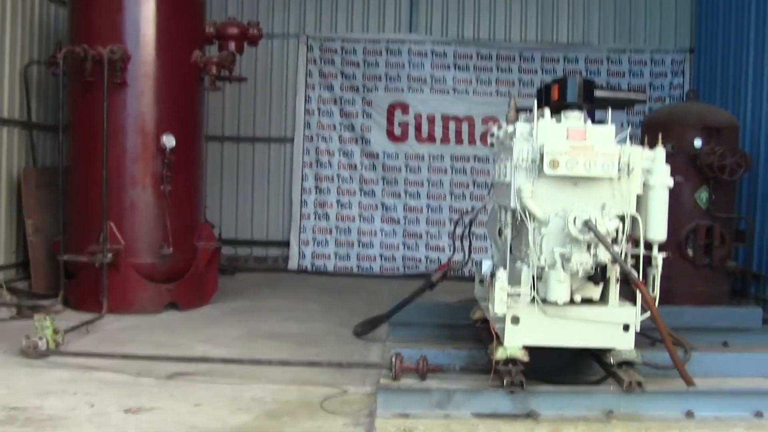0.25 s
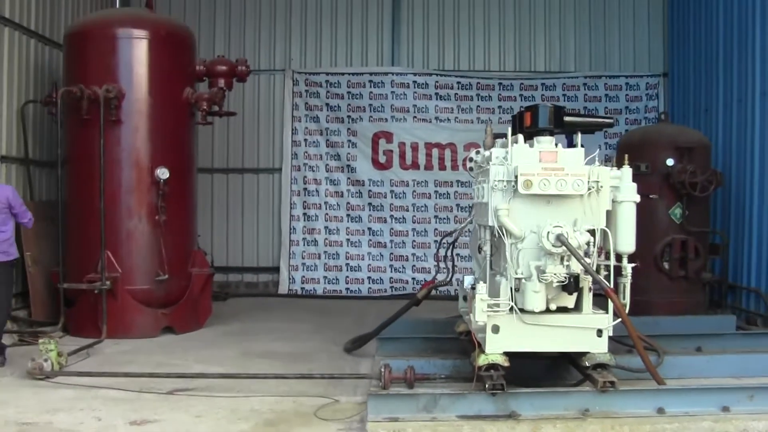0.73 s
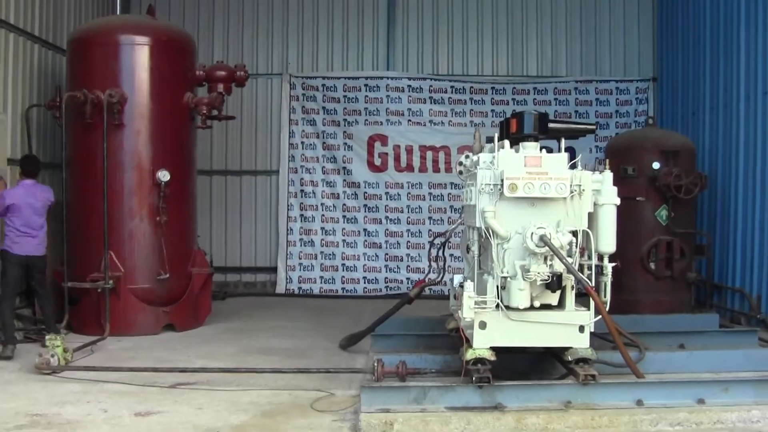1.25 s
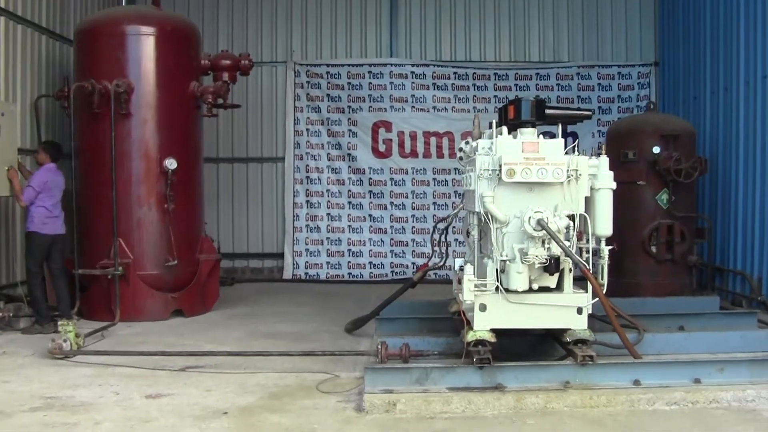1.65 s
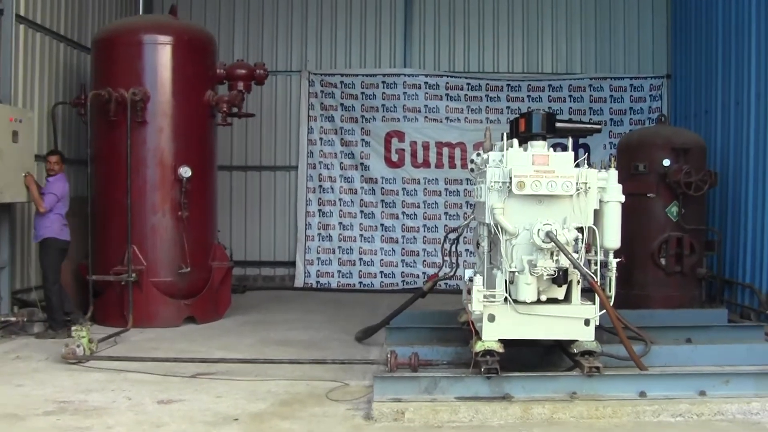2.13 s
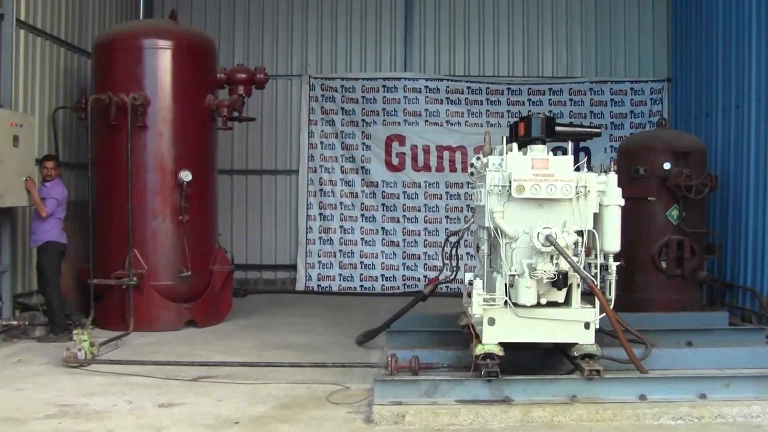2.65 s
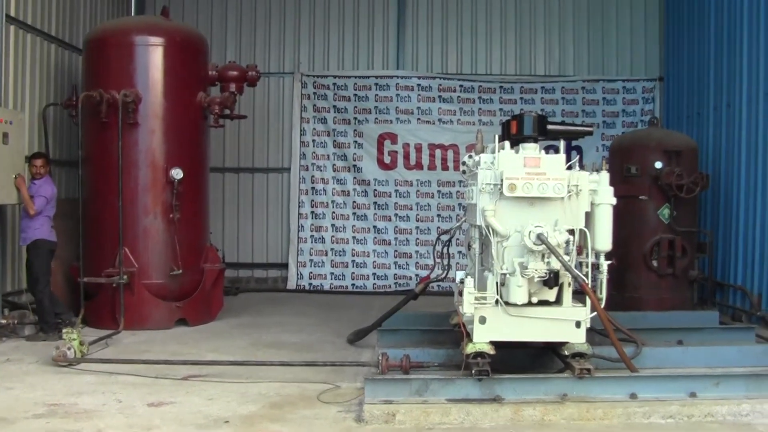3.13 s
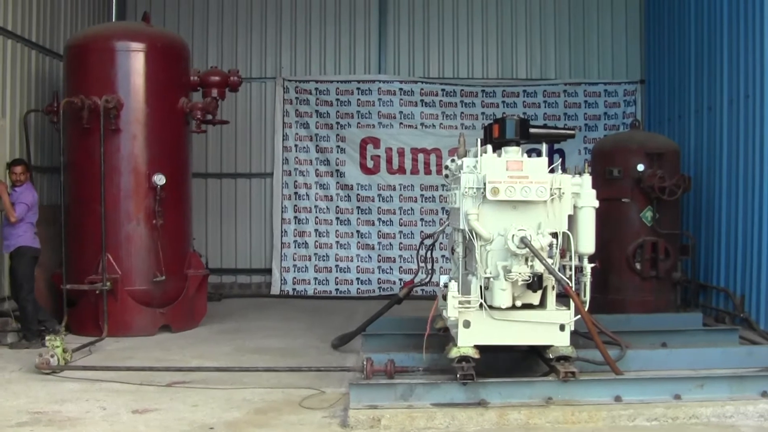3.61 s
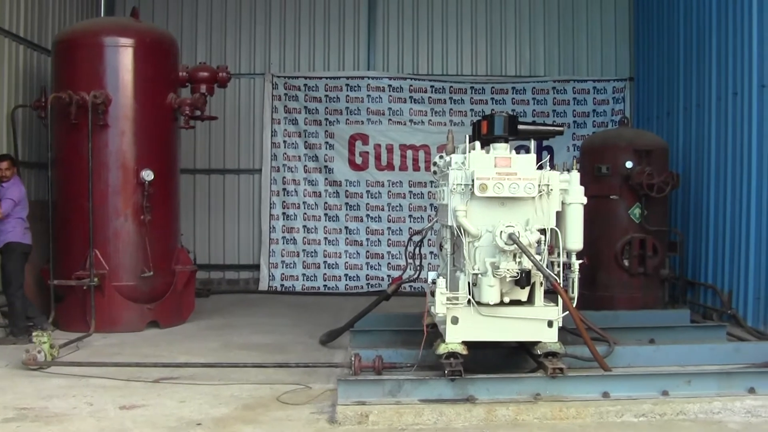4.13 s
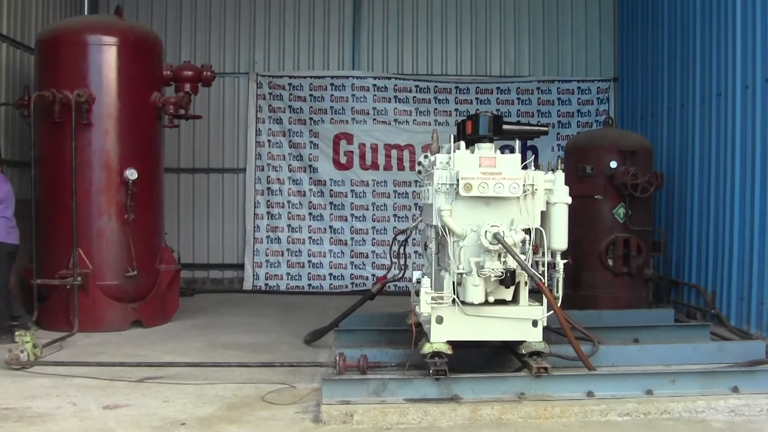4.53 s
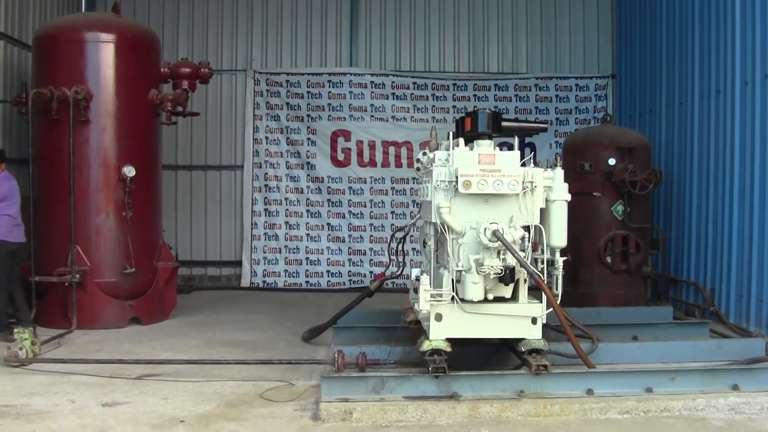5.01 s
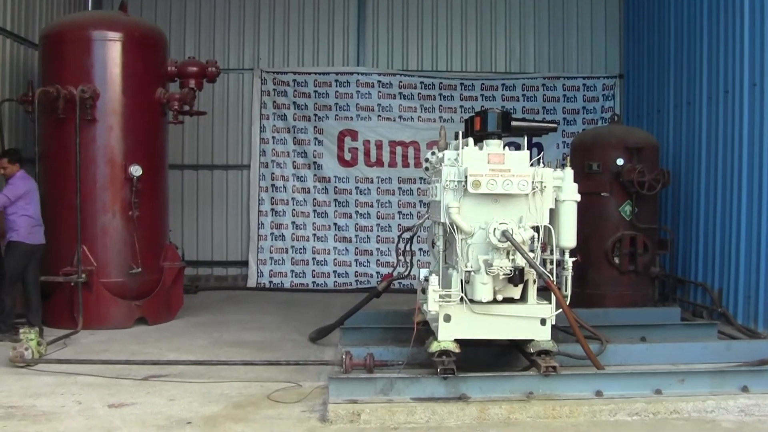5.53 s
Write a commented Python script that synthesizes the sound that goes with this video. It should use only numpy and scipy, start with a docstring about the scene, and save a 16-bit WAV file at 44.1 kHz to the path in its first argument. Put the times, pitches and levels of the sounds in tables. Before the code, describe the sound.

A piston compressor drones and clatters in a metal shed, is cut and chugs down quickly, then a loud blast of compressed air hisses to the end.

```python
"""A piston air compressor drones and clatters in a sheet-metal shed while the microphone backs off, then swings aside.
The drone is a sum of multiples of the crank speed; the clatter is ticks repeated every turn plus loose noise.
The motor is cut and the crank coasts down, chugging in noise puffs with a few ringing knocks.
Then the unloader valve blows off compressed air: shaped noise hisses, with a thin, sinking sine whistle."""
import sys
import numpy as np
from scipy import signal
from scipy.fft import rfft, irfft, next_fast_len
from scipy.io import wavfile
from scipy.ndimage import uniform_filter1d, map_coordinates

SR = 44100
rng = np.random.default_rng(int(sys.argv[2]) if len(sys.argv) > 2 else 0)


def wav_record(signal):
    """Record a signal, one row per channel, as 16-bit PCM in the file named by sys.argv[1]."""
    frames = np.transpose(np.atleast_2d(signal))
    bounded = np.clip(frames, -1, 1)
    # unit amplitude maps onto the largest positive 16-bit level
    quanta = np.round(bounded * 32767).astype(np.int16)
    wavfile.write(sys.argv[1], SR, quanta)


N = 254006
TIME = np.arange(N) / SR

# Crank slowing after the cut: (time [s], speed [turns per s])
COAST_SPEED = [(3.0, 24.68), (3.06, 22.8), (3.22, 19.2), (3.4, 15.5), (4.17, 4)]
# The microphone's walk away from the machine: (time [s], added distance [m])
WALK = [(0, 0), (.5, .2255), (1, .409), (1.5, .564), (2, .625), (3, .595)]
# Multiples of the crank speed; in the intake band the wall echoes swell about these levels:
# (order [per turn], level halfway along the walk [dB], tilt [dB per m], bend [dB per m^2],
# drift once the microphone swings [dB per s])
CRANK_ORDERS = [(1, -73.3, 19, -91, 2), (2, -52.4, 1, 4, -2), (3, -29.6, 2, -1, -1), (4, -45.4, 7, -37, 0),
                (5, -35.8, 8, 36, -1), (6, -24.4, -3, 9, 0), (7, -32.2, 3, 4, -2),
                (8, -31.3, -11, -87, -19), (9, -37.5, -29, -105, -1), (10, -34.5, 0, -43, -1),
                (11, -42.4, 27, -123, 0), (12, -40.0, -5, -20, 0), (13, -33.0, -32, -54, 10),
                (14, -29.6, -5, 34, -5), (15, -26.9, -1, -2, -2), (16, -34.2, -30, -108, 6),
                (17, -18.4, -8, 3, -1), (18, -19.4, 5, -50, 4), (19, -23.2, 4, -18, 1),
                (20, -18.5, 5, -91, 3), (21, -21.7, 9, -5, -2), (22, -24.6, -18, 30, -3),
                (23, -36.6, 10, 21, 0), (24, -33.9, 5, 13, 0), (25, -30.7, -14, -13, 0),
                (26, -39.3, -5, -17, -8), (27, -38.4, -18, -33, -16), (28, -39.3, -18, -25, 2),
                (29, -41.8, -8, -28, -1), (30, -41.4, -4, 40, 6), (31, -38.7, -8, -29, 0),
                (32, -42.9, 22, -8, -1), (33, -45.7, 25, -4, -1), (34, -38.1, -6, -44, -3),
                (35, -48.0, -1, 36, -3), (36, -43.3, -2, -151, 5), (37, -45.6, -7, 116, 0),
                (38, -43.5, -19, 19, 8), (39, -41.8, -18, -42, -3), (40, -46.9, 5, -55, 4),
                (41, -50.0, 4, 116, -3), (42, -50.6, 4, -37, 4), (43, -31.7, 3, -123, -7),
                (44, -48.9, -8, 54, 2), (45, -39.1, 0, -63, -18), (46, -44.3, -33, -56, 1),
                (47, -40.6, -3, -106, -12), (48, -45.8, 4, 2, -14), (49, -50.3, -16, 27, -2),
                (50, -47.6, 13, 79, -10), (51, -42.1, -12, 8, 2), (52, -46.1, 15, -72, 3),
                (53, -42.6, 4, -85, -12), (54, -49.1, -17, 42, -7), (55, -46.4, 2, 40, 0),
                (56, -44.2, -9, -23, 8), (57, -43.6, -14, -84, -5), (58, -43.6, -10, -232, 4),
                (59, -45.1, -2, -6, 0), (60, -43.5, 21, -19, -4), (61, -51.9, -10, 15, 1),
                (62, -53.6, -14, 16, 6), (63, -54.4, 14, 79, -3), (64, -46.3, 6, -44, -2),
                (65, -50.0, -23, -85, 9), (66, -46.7, 11, -63, 0), (67, -46.1, -8, 19, -1),
                (68, -51.1, 3, 51, -4), (69, -53.7, -11, 62, 5), (70, -55.3, 14, 90, -5),
                (71, -48.0, 3, 15, -2), (72, -45.3, 20, -65, -42), (141, -54.8, 10, 42, 1),
                (145, -56.5, 11, 31, 3), (149, -57.6, 14, 85, -1), (153, -50.0, -3, 24, 6),
                (156, -52.2, 21, -30, 2), (159, -62.0, -3, 87, 8), (162, -51.2, 8, -106, 6),
                (163, -58.3, -3, 59, 4)]
# Pressure pulses in one turn, for the bass, the intake band and the valve band above it:
# (crank angle [turns], size [dB], ... repeated for each pulse, then phase skew [cycles])
FRAME_PULSES = [(.3272, .7, .692, 4.1, .624, 2.3, .961, -7.1, .15)]
INTAKE_PULSES = [(0.974, 0.085, 0.8402, -0.9593, 0.1654, 5.1574, 0.5335, 2.3246, 0.2499, -9.7225, 0.7344, 0.175, -0.4206)]
VALVE_PULSES = [(.897, 0, .158, -.4, .544, -4.5, .603, -11, .721)]
# Echoes from shed walls and tanks: (level [dB], delay [ms], path gained per distance walked [m per m])
ECHOES = [(0.051, 15.705, 0.995), (-8.674, 37.956, 0.571), (-3.148, 17.003, 0.713),
          (-19.539, 37.373, -1.719), (-13.078, 6.663, 0.84), (-8.389, 51.539, 1.06)]

# Noise colours; each is later scaled as a whole: (frequency [Hz], relative level [dB per Hz])
CASING_COLOUR = [(710, -36), (1200, -8), (1440, -10.5), (1550, -11.5), (1810, -5.5), (1970, -7.5),
                 (2740, -11), (3210, -11.5), (3720, -10.5), (4310, -15.5), (5980, -19.5), (6860, -19),
                 (10100, -24), (12300, -36.5), (15000, -56)]
AIR_COLOUR = [(18, -52), (30, -30), (60, -9), (102, -34), (144, -1), (214, -13), (270, -2.5), (330, 1),
              (385, -14), (440, 2), (535, -4), (673, -9), (1000, -13), (1500, -17), (1950, -61),
              (3300, -120)]  # air noise between the orders
VALVE_RING_COLOUR = [(3300, -31), (3550, -11), (3780, -20), (4050, -0.5), (4300, -28), (5500, -13),
                     (5900, 7), (6250, 0), (6600, -30)]  # ringing valve plates
LOADED_COLOUR = [(35, -44), (60, -27), (91, -14.5), (187, -1), (252, -14), (330, -6.5), (429, -2.5),
                 (525, -2), (640, -11), (776, -20), (839, -12.5), (980, -19), (1060, -15.5), (1980, -27),
                 (2500, -33), (3250, -61), (5500, -120)]  # coasting against pressure
IDLE_COLOUR = [(18, -59), (30, -31), (118, -13), (254, -11), (292, -6.5), (362, -6.5), (455, -3.5),
               (530, -0.5), (590, -3.5), (650, -3), (759, -12), (900, -14), (1170, -17.5), (1980, -120)]  # unloaded rumble in the pipes
BODY_COLOUR = [(410, -32), (700, -10), (850, -6), (950, -6), (1040, -6), (1320, -1), (1510, -2.5),
               (2160, 1.5), (2700, 0), (2970, -5.5), (3300, -5.5), (4290, -13.5), (7260, -120)]  # lower part of the jet
HISS_COLOUR = [(1940, -11.5), (3300, -3), (4120, -1), (5440, -3), (7510, -0.5), (9500, -6), (12400, -39),
               (20900, -120)]
FIZZ_COLOUR = [(9000, -10), (9500, -2), (10500, -2), (12000, -6), (13000, -14), (14000, -15.5),
               (15700, -36)]  # top of the jet
# Colour change of the air noise with distance; only its dips are used, scaled down:
# (frequency [Hz], unscaled change [dB])
AIR_DIPS = [(160, 0), (200, -22), (260, -2), (310, -18), (370, -3), (395, -22), (420, 0), (600, 0),
            (660, -13), (750, 0), (800, 22), (850, -10), (970, -10), (1050, 14), (1130, -26), (1240, 10)]

# Strokes that stand out in the coasting: (time [s], level before HARD_DB [dB], intake ring [Hz])
HARD_STROKES = [(3.03, -9, 500), (3.066, -5.5, 490), (3.11, -8, 500), (3.123, -8, 490), (3.15, -9, 430),
                (3.173, -7.5, 480), (3.199, -6, 540), (3.228, -6, 500), (3.243, -10, 560), (3.265, -7, 430),
                (3.296, -7, 430), (3.335, -5.5, 515), (3.374, -7, 345)]
# Edge tone of the valve, before its flutter: (time [s], pitch [Hz], left level [dB], right level [dB])
WHISTLE = [(3.45, 11386, -37.2, -38.9), (3.53, 11381, -28.8, -28.8), (3.61, 11385, -31.5, -27.4),
           (3.69, 11394, -38.4, -27.8), (3.77, 11378, -26.9, -26.6), (3.84, 11381, -26.9, -24.1),
           (3.92, 11382, -27.2, -25.1), (4.0, 11360, -28.1, -27.7), (4.08, 11345, -28.2, -29.7),
           (4.16, 11332, -25.3, -30.5), (4.24, 11333, -23.5, -36.5), (4.32, 11311, -37.6, -27.9),
           (4.4, 11303, -31.8, -30.5), (4.48, 11292, -33.5, -28.5), (4.56, 11263, -27.9, -35.4),
           (4.63, 11260, -25.0, -32.9), (4.71, 11252, -23.8, -26.4), (4.79, 11247, -27.8, -26.4),
           (4.87, 11245, -29.0, -22.3), (4.95, 11242, -25.1, -22.3), (5.03, 11227, -26.2, -33.1),
           (5.11, 11229, -24.2, -31.0), (5.19, 11228, -28.8, -30.7), (5.27, 11211, -32.7, -24.2),
           (5.35, 11216, -27.5, -23.0), (5.42, 11219, -19.6, -37.4), (5.5, 11211, -26.1, -25.3),
           (5.58, 11197, -21.8, -29.9), (5.66, 11205, -24.6, -23.7), (5.74, 11206, -36.8, -25.5)]

# Machine's left-right balance: (frequency [Hz], left minus right [dB])
MACHINE_LEAN = [(60, 0), (150, .8), (260, 0), (340, -2.5), (450, -3), (750, -3.2), (1100, -2), (1500, -1),
                (4970, -.5), (15000, 0)]
# Machine's timing between the sides: (frequency [Hz], lead of the left [radians])
MACHINE_LEAD = [(75, 0), (150, -.18), (280, -.32), (400, -.13), (550, -.07), (750, .08), (1400, .05),
                (3000, 0)]
# Stereo width of machine and jet noise: (frequency [Hz], side minus mid [dB])
MACHINE_WIDTH = [(60, -25), (150, -25), (300, -17), (600, -20), (1000, -15), (1800, -21), (2800, -17.5),
                 (4400, -13), (8000, -12.5), (11000, -7), (15000, 12)]
JET_WIDTH = [(60, -10), (200, -2), (700, -5.5), (1300, -4.5), (2400, -11.5), (4400, -14.5), (8000, -15.5),
             (11000, -9), (12500, 2), (15000, 0)]
# Wind filter on the mid and on the side signal: (frequency [Hz], gain [dB])
WIND_MID = [(20, -28), (60, -21), (125, -22), (250, -8.5), (500, -6), (1000, 0.5)]
WIND_SIDE = [(60, -90), (3600, -90), (4300, -45), (4900, 1.5)]

SHAFT_HZ, TURN = 24.68, 2048  # steady crank speed; grid size of one turn
CUT_S, VALVE_S = 3.0, 3.365  # the motor is cut; the unloader valve starts to open
SOUND_M_PER_S, RING_OUT_S = 343, 0.7  # speed of sound; the drone's 60 dB fall time in the shed
INTAKE_ORDER, VALVE_ORDER = 13, 27  # first order of the intake band and of the valve band
TROUGH_ORDER = 16  # lies between two intake pipe resonances and swings against its neighbours
HALFWAY_M, SWING_S = .35, 1.8  # the microphone slowly swings aside from SWING_S on
PATTERN_M = .2  # walk over which the tick pattern renews
LOCKED_SHARE, TICK_TOP_HZ = .6, 7100  # rattle power that repeats each turn; it fades around this frequency
CLATTER_DB, JOLT_DB, JOLT_S = -30.5, 3.5, 0.03  # valves and casing; jolt at the cut and its fall time
AIR_DB, RING_DB = -28.5, -59.5
RATTLE_DB_PER_M, RING_DB_PER_M = -0.5, 9.5  # the casing recedes, the valve plates come into view
LOADED_DB, UNLOAD_S = -16, 0.029  # coasting against pressure; delay from valve to falling load
THROB_DB, THROB_SAG_DB_PER_S = -28.5, 30  # three strokes a turn, sinking
IDLE_DB, IDLE_SAG_DB_PER_S = -22.5, 3.5
HARD_S, HARD_RISE_S, HARD_DB = 0.052, 0.0024, 1  # knocks: 60 dB fall time, rise, added level
THUMP_HZ, THUMP_DB, THUMP_S = 184.3, -9.5, 0.12  # frame ring in each knock; 60 dB fall time
CRACK_HZ, CRACK_DB, CRACK_S = 930, 3, 0.0076  # short crack in each knock; 60 dB fall time
OPEN_S, LEAK_DB = 0.029, -31  # opening time; level of the first leak
BLAST_DB, SAG_DB_PER_S = -17, 0.2  # steady hiss; the tank running down
SURGE_DB, SURGE_S = 4, 0.39  # first surge above the hiss and its fall time
BODY_DB, BODY_SAG_DB_PER_S = -3.5, 1.62  # against the hiss
FIZZ_DB, FIZZ_LATE_DB = -10.5, 1  # against the hiss; the fizz takes less part in the surge
JET_LAG_S, WHISTLE_LAG, WAVER_DB = 3e-6, .7, 1.8  # left lags in seconds, in radians; tone flutter
SHED_T60_S, SHED_DIRECT_DB = .8, 10  # 60 dB fall time; direct sound over diffuse tail
WIND_CUT_S, WIND_FADE_S = 4.175, 0.0039  # start and fade of the wind filter
LOW_HZ, TOP_HZ, CEILING = 26, 15665, .95
SIDES = np.array([[.5], [-.5]])  # splits a difference between left and right


def amp(db):
    """Turns dB into gain."""
    return 10 ** (np.asarray(db) / 20)


def unit(x):
    """Scales to rms 1."""
    return x / np.sqrt(np.mean(x ** 2) + 1e-20)


def along(points, hz):
    """Reads a (frequency, value) curve on a log axis, holding its end values outside."""
    f, v = np.transpose(points)
    return np.interp(np.log(hz + 1), np.log(f + 1), v)


def curves(rows, **ends):
    """Gives one value per sample for each column after the time."""
    s, *cols = np.transpose(rows)
    return [np.interp(TIME, s, c, **ends) for c in cols]


def ramp(start_s, length_s):
    """Stays 0 before the start, then rises to 1."""
    return np.clip((TIME - start_s) / length_s, 0, 1)


def since(start_s):
    """Counts seconds after the start, 0 before."""
    return np.clip(TIME - start_s, 0, None)


def wobble(rate):
    """Draws a smooth random curve with rate knots a second."""
    return map_coordinates(rng.standard_normal(int(N * rate / SR) + 4), [TIME * rate])


def filtered(x, response):
    """Multiplies the spectrum of x by a response of frequency."""
    m = next_fast_len(N + SR // 2)
    return irfft(rfft(x, m) * response(np.fft.rfftfreq(m, 1 / SR)), m)[..., :N]


def coloured(pair, spectrum, width):
    """Colours a mid and a side excitation alike; returns left and right with a mid of rms 1."""
    def closed(hz):
        inside = (hz > spectrum[0][0]) * (hz < spectrum[-1][0])
        return amp(along(spectrum, hz)) * inside

    mid, wide = filtered(pair, lambda hz: closed(hz) * [np.ones_like(hz), amp(along(width, hz))])
    return np.array([mid + wide, mid - wide]) / np.sqrt(np.mean(mid ** 2))


def noise(patchy_db):
    """Makes two white noises that share time-frequency patches of random gain."""
    z = signal.stft(rng.standard_normal((2, N)), nperseg=512)[2]
    field = uniform_filter1d(rng.standard_normal(z.shape[1:]), 6, axis=0)
    field = uniform_filter1d(field, 10, axis=1)
    return signal.istft(z * amp(patchy_db * unit(field)), nperseg=512)[1][:, :N]


def crank():
    """Crank angle in turns, delayed by the walk: at steady speed, and with the coasting."""
    speed, = curves(COAST_SPEED, left=SHAFT_HZ, right=0)
    late = SHAFT_HZ * curves(WALK)[0] / SOUND_M_PER_S
    return SHAFT_HZ * TIME - late, np.cumsum(speed) / SR - late


def line_up(order, row):
    """Phase of each order in a turn made of these pulses."""
    at, size_db = np.reshape(row[:-1], (-1, 2)).T
    pulses = np.exp(-2j * np.pi * order * at) @ amp(size_db)[:, None]
    return np.angle(pulses) + 2 * np.pi * row[-1]


def drone(angle):
    """Repeats a pressure wave each turn; wall echoes slide against it as the microphone moves."""
    order, level_db, tilt, bend, drift = np.transpose(CRANK_ORDERS)[:, :, None]
    bass = order < INTAKE_ORDER
    intake = (order >= INTAKE_ORDER) & (order < VALVE_ORDER)
    intake_phase = line_up(order, INTAKE_PULSES[0]) + np.pi * (order == TROUGH_ORDER)
    phase = np.where(bass, line_up(order, FRAME_PULSES[0]), intake_phase)
    phase = np.where(order < VALVE_ORDER, phase, line_up(order, VALVE_PULSES[0]))

    s = np.linspace(0, CUT_S, num=200)
    walk = np.interp(s, *np.transpose(WALK))
    paths = 1  # direct sound
    for db, ms, gain in ECHOES:
        delay = ms / 1000 + (gain - 1) * walk / SOUND_M_PER_S
        paths = paths + amp(db) * np.exp(-2j * np.pi * SHAFT_HZ * order * delay)
    # in the bass the walls only turn the phase; the intake swells and fades; the valve blows come straight
    mean_size = np.sqrt(np.mean(abs(paths) ** 2, axis=1, keepdims=True))
    paths /= np.where(intake, mean_size, np.where(bass, abs(paths), paths))
    off = walk - HALFWAY_M
    order_db = level_db + tilt * off + bend * off ** 2 + drift * np.clip(s - SWING_S, 0, None)
    paths *= amp(order_db) * np.exp(1j * phase)

    # one waveform of a turn for each moment of the walk
    lines = np.zeros((len(s), TURN + 1), complex)
    lines[:, order[:, 0].astype(int)] = paths.T
    turns = irfft(lines) * TURN * np.sqrt(2)
    turns = np.hstack([turns, turns[:, :1]])
    moment = np.interp(TIME, s, np.arange(len(s)))
    wave = map_coordinates(turns, [moment, angle % 1 * 2 * TURN], order=1) * (TIME < VALVE_S)
    return amp(0.029 * wobble(10.5) - 60 * since(CUT_S) / RING_OUT_S) * wave


def standpoints(count):
    """Share of each stretch of the walk at each sample."""
    return np.clip(1 - abs(curves(WALK)[0] / PATTERN_M - np.arange(count)[:, None]), 0, 1)


def repeat(turns, angle):
    """Plays one pattern a turn, cross-faded between the standpoints."""
    share = np.sqrt(standpoints(count=len(turns)))
    grid = np.arange(TURN) / TURN
    return sum(w * np.interp(angle % 1, grid, turn, period=1) for w, turn in zip(share, turns))


def clatter(angle):
    """Valve ticks return at the same crank angles; loose casing and air noise lies over them."""
    shape = int(np.max(WALK, axis=0)[1] / PATTERN_M) + 2, TURN
    unevenness = unit(uniform_filter1d(rng.standard_normal(shape), size=30, mode="wrap"))
    ticks = rng.standard_normal((2, *shape)) * amp(3.0 * unevenness)
    locked = unit(np.array([repeat(turns, angle) for turns in ticks]))
    loose = noise(patchy_db=1.0)

    def share(hz):
        return LOCKED_SHARE / (1 + (hz / TICK_TOP_HZ) ** 4)

    mix = filtered(locked, lambda hz: np.sqrt(share(hz))) + filtered(loose, lambda hz: np.sqrt(1 - share(hz)))
    walk, = curves(WALK)
    jolt_db = JOLT_DB * ramp(CUT_S - .02, 0.022) * np.exp(-since(CUT_S) / JOLT_S)
    rattle_db = CLATTER_DB + RATTLE_DB_PER_M * walk + jolt_db
    rattle = amp(rattle_db) * coloured(mix, CASING_COLOUR, MACHINE_WIDTH)

    near = amp(AIR_DB) * coloured(noise(patchy_db=0.5), AIR_COLOUR, MACHINE_WIDTH)
    far = filtered(near, lambda hz: amp(0.049 * np.minimum(along(AIR_DIPS, hz), 0)))
    air = near + (far - near) * walk / walk.max()
    plates = amp(RING_DB + RING_DB_PER_M * walk) * coloured(mix, VALVE_RING_COLOUR, MACHINE_WIDTH)
    ring_out = amp(-60 * since(CUT_S) / RING_OUT_S)
    return (1 - ramp(VALVE_S, OPEN_S)) * (rattle + ring_out * (air + plates))


def chug(angle):
    """Uneven coasting strokes puff through the intake until the valve unloads the cylinders."""
    stroke = 3 * angle
    sizes = amp(rng.normal(0, 1.5, int(stroke.max()) + 2))
    size = sizes[np.clip(stroke, 0, None).astype(int)]
    puffs = (1.5 + 0.52 * size * np.exp(-3.2 * (stroke % 1))) * rng.standard_normal((2, N))
    unloaded = ramp(VALVE_S + UNLOAD_S, .015)
    load = ramp(CUT_S, 0.049) * (1 - unloaded)
    loaded = amp(LOADED_DB) * coloured(puffs, LOADED_COLOUR, MACHINE_WIDTH)
    throb_gain = np.sqrt(2) * amp(THROB_DB - THROB_SAG_DB_PER_S * since(CUT_S))
    throb = throb_gain * np.sin(2 * np.pi * stroke)
    idle_gain = amp(IDLE_DB - IDLE_SAG_DB_PER_S * since(VALVE_S))
    idle = idle_gain * coloured(noise(patchy_db=0.5), IDLE_COLOUR, JET_WIDTH)
    return load * (loaded + throb) + unloaded * idle


def knocks():
    """Hard strokes ring the intake pipe and the frame as dying sines, each with a short crack."""
    def ring(t, hz, t60):
        return (1 - np.exp(-t / HARD_RISE_S)) * amp(-60 * t / t60) * np.sin(2 * np.pi * hz * t)

    total = np.zeros(N)
    for s, db, hz in HARD_STROKES:
        t = since(s)
        thump = amp(THUMP_DB) * ring(t, THUMP_HZ, THUMP_S)
        crack = amp(CRACK_DB) * ring(t, CRACK_HZ, CRACK_S)
        total += amp(db + HARD_DB) * (ring(t, hz, HARD_S) + thump + crack)
    return total


def shed(x):
    """The sheet-metal walls add a dying random tail, which colours the sound unevenly."""
    t = np.arange(SR // 2) / SR
    tail = rng.standard_normal((2, len(t))) * amp(-60 * t / SHED_T60_S)
    tail /= np.linalg.norm(tail[0])
    tail[:, 0] = amp(SHED_DIRECT_DB)
    return signal.fftconvolve(x, tail / np.linalg.norm(tail[0]), axes=1)[:, :N]


def blow_off():
    """Escaping air makes a turbulent jet: three noise bands surge, then sag, with a faint level flicker."""
    surge = np.exp(-since(VALVE_S + OPEN_S) / SURGE_S)
    open_db = BLAST_DB + SURGE_DB * surge - SAG_DB_PER_S * since(VALVE_S)
    hiss_db = LEAK_DB + (open_db - LEAK_DB) * ramp(VALVE_S, OPEN_S)
    flicker_db = 0.082 * wobble(5.1) + 0.14 * wobble(25.26)
    body, hiss, fizz = (coloured(shed(noise(patchy_db=0.5)), colour, JET_WIDTH)
                        for colour in (BODY_COLOUR, HISS_COLOUR, FIZZ_COLOUR))
    body_gain = amp(BODY_DB - BODY_SAG_DB_PER_S * since(VALVE_S))
    jet = hiss + body_gain * body + amp(FIZZ_DB - FIZZ_LATE_DB * surge) * fizz
    jet = filtered(jet, lambda hz: np.exp(-2j * np.pi * hz * JET_LAG_S * SIDES))
    return ramp(VALVE_S - .01, 0.016) * amp(hiss_db + flicker_db) * jet


def whistle():
    """The valve edge sings one sinking tone, slightly unsteady in pitch, level and side."""
    pitch, *tone_db = curves(WHISTLE)
    phase = 2 * np.pi * np.cumsum(pitch + 6 * wobble(40)) / SR
    gain = np.sqrt(2) * amp(tone_db + WAVER_DB * np.array([wobble(32), wobble(30)]))
    tone = gain * np.sin(phase + (.6 * wobble(7) - WHISTLE_LAG) * SIDES)
    return ramp(WHISTLE[0][0] - .03, .04) * tone


def scene():
    """The machine leans to the right in the intake band; the jet sits in front."""
    steady, angle = crank()
    machine = drone(steady) + clatter(angle) + chug(angle) + knocks()

    def placing(hz):
        return amp(SIDES * along(MACHINE_LEAN, hz)) * np.exp(1j * SIDES * along(MACHINE_LEAD, hz))

    return filtered(machine, placing) + blow_off() + whistle()


def record(dry):
    """Rounds peaks; a wind filter thins the bass and folds all but the treble to mono; limits the band."""
    held = dry / (1 + abs(dry / CEILING) ** 6) ** (1 / 6)
    pair = np.array([held[0] + held[1], held[0] - held[1]]) / 2
    cut = filtered(pair, lambda hz: amp([along(WIND_MID, hz), along(WIND_SIDE, hz)]))
    mid, side = pair + (cut - pair) * ramp(WIND_CUT_S, WIND_FADE_S)
    stereo = np.array([mid + side, mid - side])
    return filtered(stereo, lambda hz: (hz < TOP_HZ) * hz ** 4 / (hz ** 4 + LOW_HZ ** 4))


dry = scene()
out = record(dry)
wav_record(out)
```